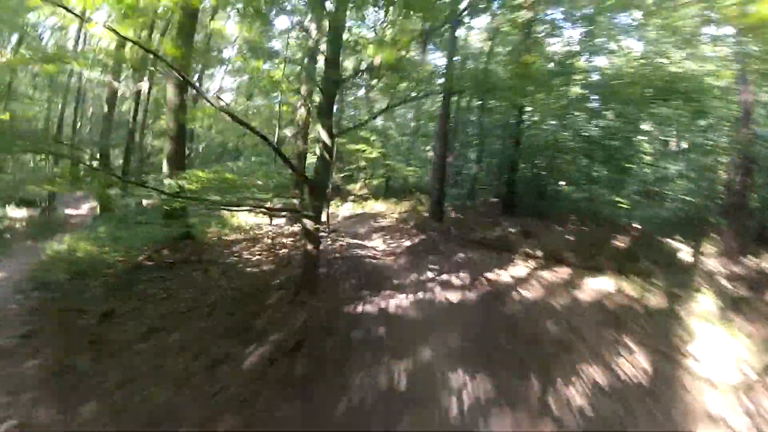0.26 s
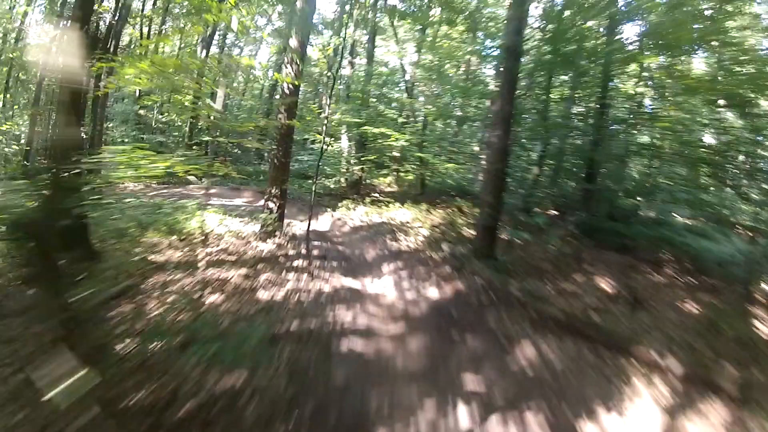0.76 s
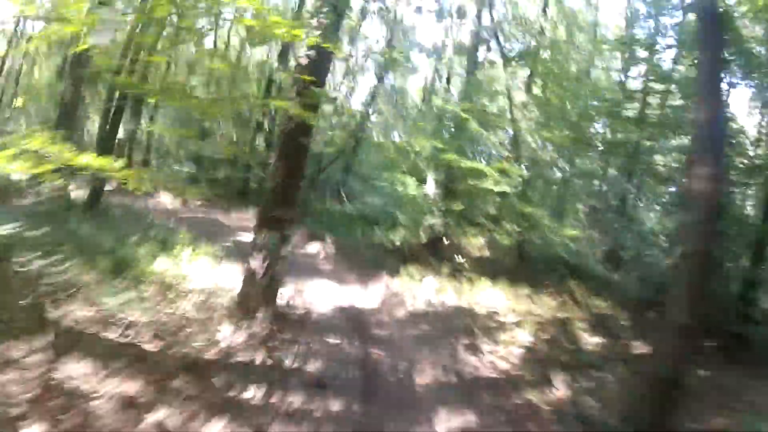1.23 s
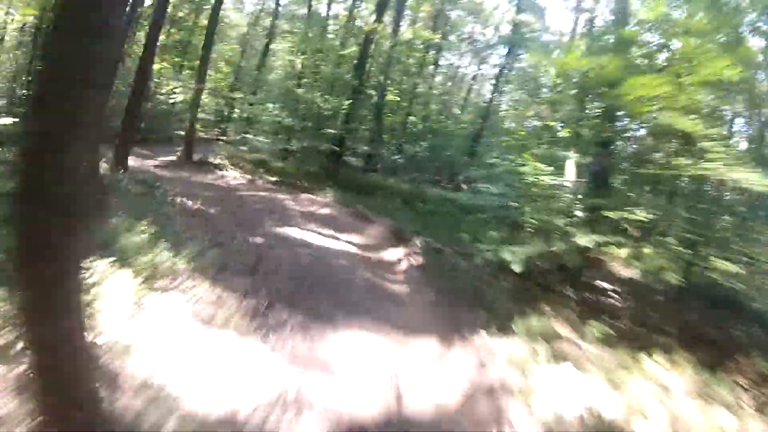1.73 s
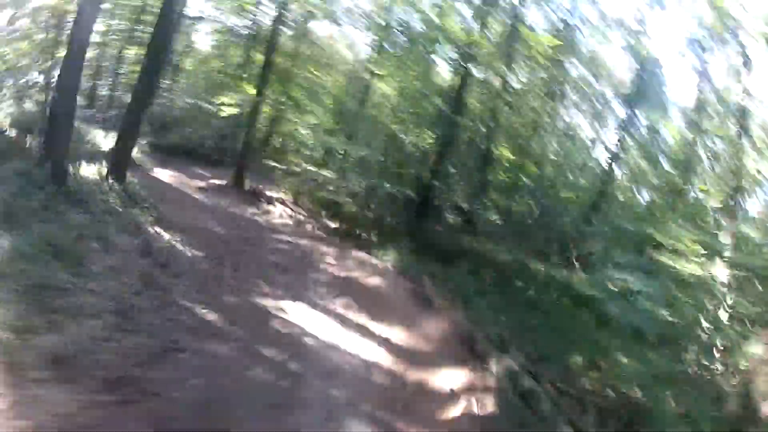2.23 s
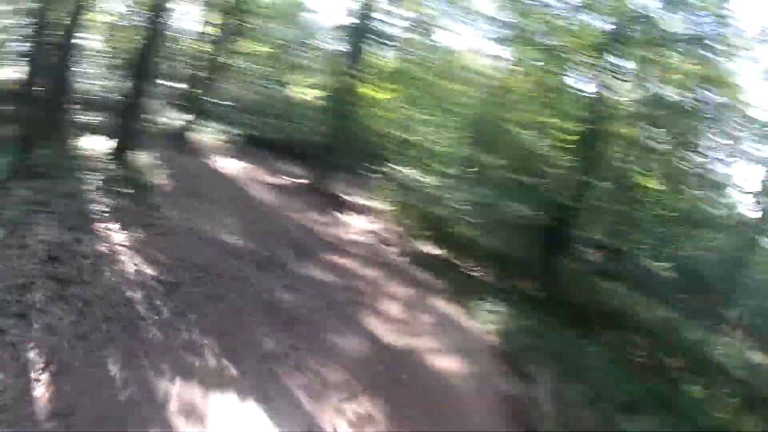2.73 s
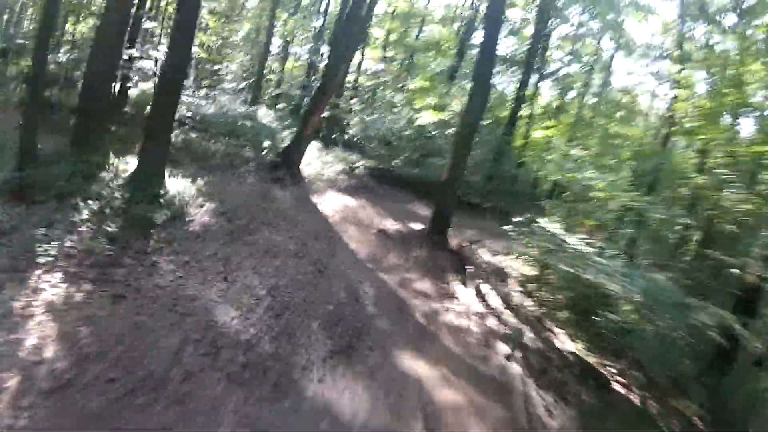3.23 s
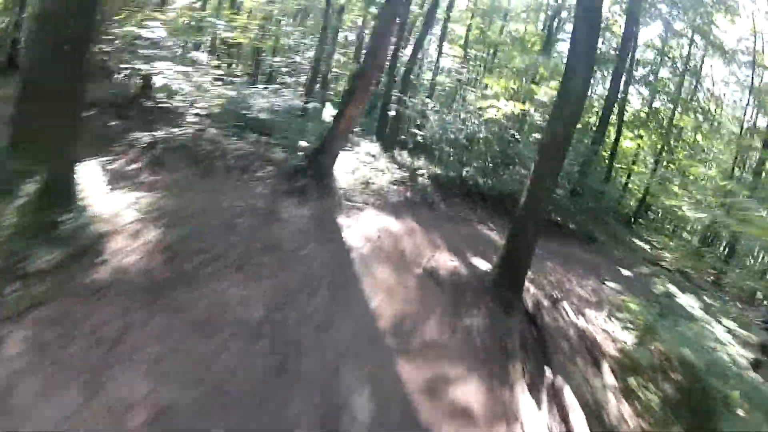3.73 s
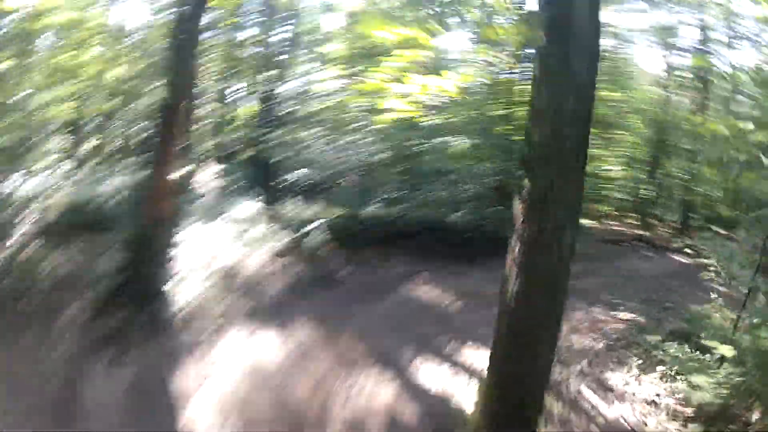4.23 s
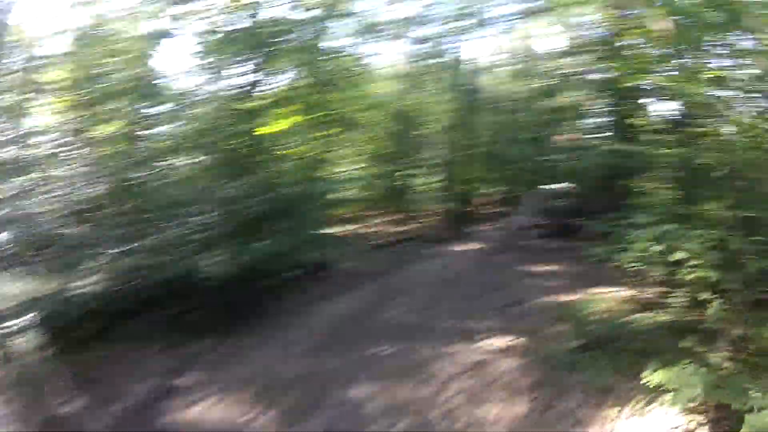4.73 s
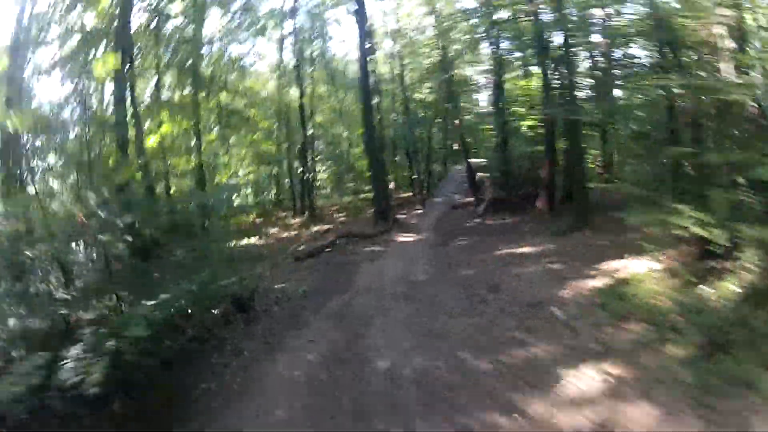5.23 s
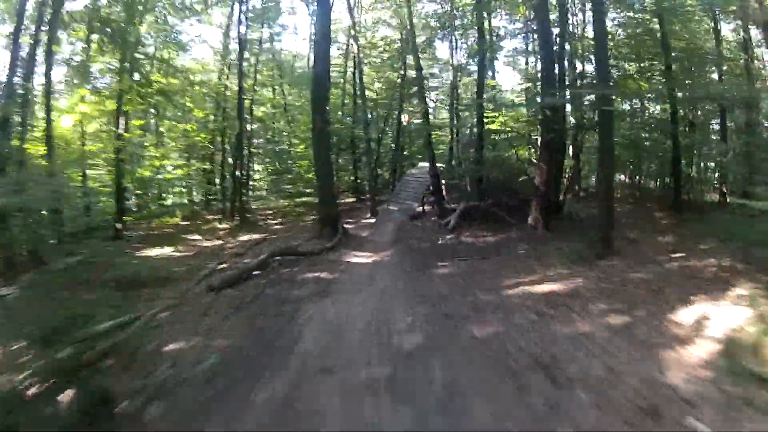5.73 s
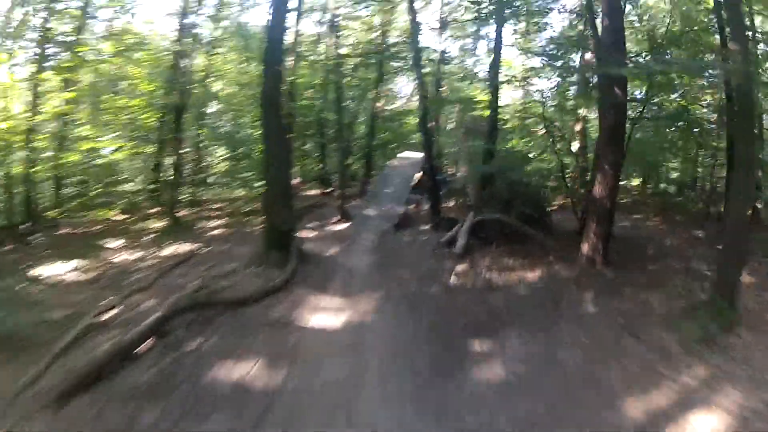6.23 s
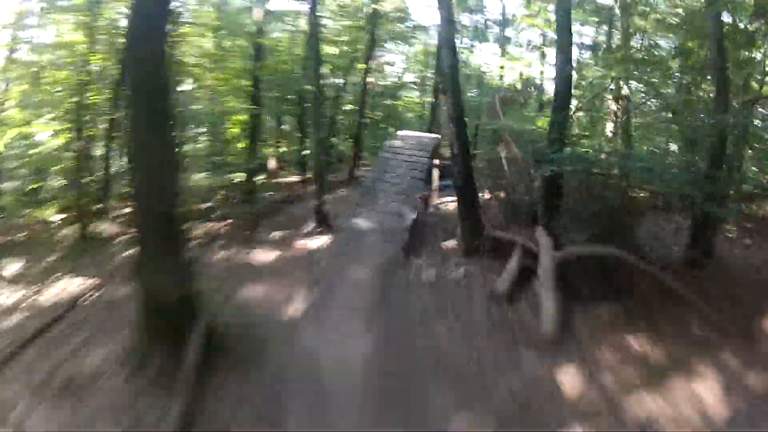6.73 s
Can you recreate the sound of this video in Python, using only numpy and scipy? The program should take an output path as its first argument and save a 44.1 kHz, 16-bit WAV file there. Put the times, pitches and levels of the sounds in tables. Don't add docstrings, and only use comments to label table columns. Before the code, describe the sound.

A small sealed camera on a bicycle hears everything close, boxy and gritty, with constant hiss and a coarse metallic edge to the treble. From 0 to 1.2 s wind and tyre roar run fairly steadily over a low rumble, with small grit ticks. At 1.3 s a loud hard clack lands with deep booming jolts; rattles and knocks crowd up to a heavy boom at 1.5 s, then thin out. Around 2.2 s a part chatters briefly, then another bright clack and boom hit at 2.3 s, a shorter, duller one at 2.7 s, and thudding jolts at 2.8 to 3 s. From 3.1 to 4.6 s it is much quieter: soft hiss, faint soil scuffs, light ticks. At 4.73 s a twig snaps on the shell with a low thump; a softer boom follows at 5.07 s. From 5.5 s wind and tyre noise grow, with a gritty scuff and rattle at 6.4 s, ending in the strongest rush.

```python
import sys
import numpy as np
from scipy import signal
from scipy.io import wavfile
from scipy.ndimage import uniform_filter1d

SR = 44100
rng = np.random.default_rng(int(sys.argv[2]) if len(sys.argv) > 2 else 0)


def persist_wave(psi):
    counts = np.round(np.clip(psi, -1, 1) * 32767).astype(np.int16)
    wavfile.write(sys.argv[1], SR, np.atleast_2d(counts).T)


def amplitude_ratio(level_db):
    exponent = np.asarray(level_db, float) / 20
    return 10 ** exponent


N = 307377


def unit(x):
    return x / np.sqrt(np.mean(x ** 2))


def band(x, hz, width_hz):
    return signal.lfilter(*signal.iirpeak(hz, hz / width_hz, fs=SR), x)


def between(x, lo_hz, hi_hz):
    return signal.sosfilt(signal.butter(2, [lo_hz, hi_hz], "bandpass", fs=SR, output="sos"), x)


def duller(x, hz):
    return signal.sosfilt(signal.butter(4, hz, fs=SR, output="sos"), x)


def colour(table, hz):
    table_hz, table_db = np.transpose(table)
    return np.interp(np.log(hz), np.log(table_hz), table_db)


def walk(rate_hz):
    hold = int(SR / rate_hz)
    steps = np.repeat(rng.standard_normal(N // hold + 1), hold)
    slewed = uniform_filter1d(uniform_filter1d(steps, hold), hold)
    return unit(slewed[:N])


def uneven_noise(n, spread_db):
    return rng.standard_normal(n) * amplitude_ratio(spread_db * rng.exponential(size=n))


def fade(t, t60_s):
    return np.exp(-np.log(1000) * t / t60_s)


def burst(t60_s, rise_s, spread_db):
    t = np.arange(SR // 10) / SR
    grains = uneven_noise(len(t), spread_db)
    return grains * (1 - np.exp(-t / rise_s)) * fade(t, t60_s)


def add(out, s, sound, peak_db):
    i = int(s * SR)
    scaled = amplitude_ratio(peak_db) * sound / np.abs(sound).max()
    out[i:i + len(sound)] += scaled[:N - i]


# frequency in Hz, level in dB per Hz.
WIND_COLOUR = [(65, -31), (110, -14), (161, -3.5), (347, -7), (545, -11.5), (898, -10.5), (1040, -26),
               (1150, -10.5), (2560, -14), (3190, -33.5), (3890, -21), (4160, -39), (5160, -41),
               (5900, -16.5), (7670, -70), (13000, -120)]
# frequency in Hz, level in dB per Hz.
TYRE_COLOUR = [(110, -7), (250, -3), (500, -12.5), (1000, -9.5), (1500, -5.5), (2200, -3), (2600, -5),
               (3100, -12.5), (4000, -30.5), (5900, -32)]
# frequency in Hz, width in Hz, level in dB (not used).
SHELL_MODES = [(898, 50, 0), (2573, 190, 0), (3570, 370, -7), (3700, 170, -9), (4980, 28, -21)]


def roar(wind_db, tyre_db):
    wind_db = -55.5 + 1.13 * (wind_db + 54.5)
    wind_power = amplitude_ratio(wind_db - 19 + 0.7 * walk(14)) ** 2
    tyre_power = amplitude_ratio(tyre_db - 33 + 1.8 * walk(22)) ** 2
    noises = [rng.standard_normal(N) for _ in range(3)]
    grit = amplitude_ratio(2.0 * rng.exponential(size=N))
    out = 0
    for k, hz in enumerate(110 * 2 ** (np.arange(18) / 3)):
        wind_part = wind_power * amplitude_ratio(colour(WIND_COLOUR, hz)) ** 2
        tyre_part = tyre_power * amplitude_ratio(colour(TYRE_COLOUR, hz)) ** 2
        noise = unit(between(noises[k % 3] * grit, hz / 1.15, hz * 1.138))
        out = out + np.sqrt((wind_part + tyre_part) * hz / 4) * noise
    return out + 0.92 * sum(band(out, hz, width_hz) for hz, width_hz, _ in SHELL_MODES)


# start in seconds, swing in dB, sway in Hz, 60 dB decay in seconds.
JOLTS_OF_MOUNT = [(1.262, -22, 33, 0.19), (2.84, -20, 33, 0.17), (4.722, -23, 58, 0.06),
                  (1.288, -9.5, 46, 0.11), (1.312, -6, 89, 0.044), (1.393, -17, 90.5, 0.18),
                  (1.435, -15.5, 49.8, 0.21), (1.453, -22, 95.5, 0.18), (1.495, -2, 88, 0.12),
                  (1.545, -21, 79, 0.15), (1.622, -27, 79.7, 0.23), (1.735, -18, 77, 0.096),
                  (2.025, -27.5, 82, 0.15), (2.287, -2, 77.7, 0.11), (2.429, -24, 73, 0.11),
                  (2.631, -25, 45.4, 0.14), (2.660, -22, 54, 0.17), (2.693, -4, 86.5, 0.12),
                  (2.813, -20.5, 44.8, .2), (2.828, -11, 79, 0.061), (2.857, -11.5, 94, 0.076),
                  (2.914, -2, 79, 0.087), (2.975, -15.5, 80, 0.11), (3.203, -31, 73.5, 0.19),
                  (3.628, -29, 74, 0.18), (4.7378, -13.5, 76.7, 0.13), (5.066, -14.5, 84, 0.056),
                  (5.490, -30, 79.4, 0.15), (5.790, -31, 72, 0.21), (5.908, -28, 67.4, 0.16)]


def jolts():
    out, t = np.zeros(N), np.arange(SR // 3) / SR
    for s, db, hz, t60_s in JOLTS_OF_MOUNT:
        swing = (1 - np.exp(-t / 0.0063)) * fade(t, t60_s) * np.sin(2 * np.pi * hz * t)
        add(out, s, swing, db + 20 * np.log10(np.abs(swing).max()))
    return out


def strike(events, body, bounce_share, push_share):
    favoured_hz, push_hz, blow_at = 2350, 1185, 8
    out = np.zeros(N)
    for s, db, tilt_db, lift_db, t60_s in events:
        blow = burst(t60_s, 0.00021, 2.62)
        blow = bounce_share * blow / np.abs(blow).max()
        blow[blow_at] = 1
        modes = 0
        for k, (hz, width_hz, mode_db) in enumerate(body):
            favour = np.exp(-(np.log2(hz / favoured_hz) / 0.42) ** 2)
            gain_db = mode_db + tilt_db * np.log2(hz / 1500) + lift_db * favour
            ring = band(band(blow, hz, width_hz), hz, 3.54 * width_hz)
            sign = (-1) ** k
            modes = modes + sign * amplitude_ratio(gain_db) * np.sqrt(width_hz) * unit(ring)
        push = duller(np.arange(len(blow)) == blow_at, push_hz)
        add(out, s, modes / np.abs(modes).max() + push_share * push / push.max(), db)
    return out


# frequency in Hz, width in Hz, level in dB.
HOUSING_MODES = [(170, 101, -1.5), (305, 260, 1.5), (476, 163, -1), (692, 263, -3.5), (1220, 145, -0.5),
                 (1480, 107, -19.5), (1820, 230, -1.5), (2350, 150, 0.5), (2970, 160, -11),
                 (3307, 180, -12.5), (3630, 166, -20.5), (3930, 920, -31.5), (5000, 150, -39.5)]
# start in seconds, peak in dB, tilt in dB per octave, lift of the favoured ring in dB,
# 60 dB decay in seconds.
HARD_CLACKS = [
    (1.2995, -2, 0.5, 10, 0.012),
    (2.2832, -4.5, 1, -3.5, 0.018),
    (2.6943, -3, -1.5, 0.5, 0.011),
]


def clacks():
    return strike(HARD_CLACKS, HOUSING_MODES, bounce_share=0.35, push_share=0.54)


# frequency in Hz, width in Hz, level in dB.
TWIG_MODES = [(180, 64, 1.5), (433, 130, -16.5), (793, 100, 1.5), (1500, 120, -9.5), (1900, 390, -2),
              (2400, 160, 0), (3180, 730, -4.5), (4120, 850, -13.5), (4760, 880, -13.5)]
# start in seconds, peak in dB, tilt in dB per octave, lift of the favoured ring in dB,
# 60 dB decay in seconds.
TWIG_SNAPS = [
    (4.7302, -12, 0, 0, 0.013),
]


def snaps():
    return strike(TWIG_SNAPS, TWIG_MODES, bounce_share=0.51, push_share=0)


# start in seconds, peak in dB, ring in Hz, hardness as edge in Hz,
# 60 dB decay in seconds.
FRAME_KNOCKS = [
    (1.486, -14, 197, 950, 0.025),
    (1.718, -24.5, 141, 550, 0.032),
    (2.027, -43, 170, 350, .013),
    (2.419, -38, 160, 300, 0.025),
    (2.836, -30, 197, 800, 0.064),
    (2.849, -22, 219, 870, 0.031),
    (2.906, -20.5, 290, 860, 0.02),
    (2.969, -26, 180, 790, 0.023),
    (3.629, -36.5, 143, 283, .021),
    (5.057, -35, 161, 278, 0.069),
]
# start in seconds, peak in dB, 60 dB decay in seconds.
HOLLOW_TAPS = [
    (1.452, -32, .079),
    (1.640, -46, .034),
    (2.615, -36.5, 0.038),
    (3.215, -55.5, .03),
    (3.386, -52, .026),
]


def thuds():
    out = np.zeros(N)
    contacts = [(s, db, 895, 1020, t60_s, -12) for s, db, t60_s in HOLLOW_TAPS]
    for s, db, hz, edge_hz, t60_s in FRAME_KNOCKS:
        edge_db = -1.5 + 12.5 * np.log2(edge_hz / 895)
        contacts.append((s, db, hz, edge_hz, t60_s, edge_db))
    for s, db, hz, edge_hz, t60_s, edge_db in contacts:
        push = duller(burst(t60_s, 0.00045, 2.0), edge_hz)
        low = band(band(push, hz, 0.37 * hz), hz, 1.5 * hz)
        edge = band(push, 0.32 * edge_hz, 0.78 * edge_hz)
        add(out, s, unit(low) + amplitude_ratio(edge_db) * unit(edge), db)
    return out


def crunch(out, s, peak_db, hz, t60_s, edge_db, rise_s):
    grains = burst(t60_s, rise_s, 1.6)
    add(out, s, band(grains, hz, 300) + 0.55 * between(grains, 1350, 2800), peak_db)
    edge = between(grains, 2100, 8300) + band(grains, 3660, 250) + 0.65 * band(grains, 5040, 264)
    add(out, s, edge, peak_db + edge_db)


# start in seconds, peak in dB, ring in Hz.
GRIT_HITS = [(0.1422, -38, 2420), (0.697, -41, 1750), (0.846, -41.5, 2500), (0.9881, -38, 1940),
             (1.043, -40.5, 2550), (1.2647, -35, 1820), (1.331, -36, 1310), (1.5586, -35.5, 2410),
             (1.6632, -40, 2460), (1.763, -37.5, 2800), (1.917, -42.5, 2400), (2.173, -38, 1480),
             (2.226, -34, 2120), (2.4217, -40, 2520), (2.453, -42.5, 2500), (2.5524, -40, 2310),
             (2.5765, -45, 2430), (2.6289, -34.5, 2530), (2.8317, -39, 1660), (3.3072, -49.5, 2380),
             (3.4022, -45.5, 1970), (3.491, -44.5, 2100), (3.791, -43.5, 2350), (3.9437, -41, 2400),
             (4.3944, -48, 2350), (4.4618, -41.5, 2400), (4.587, -42.5, 2350), (4.878, -48, 2300),
             (5.056, -46.5, 2260), (5.5608, -49, 2370)]


def grit_ticks():
    out = np.zeros(N)
    for s, db, hz in GRIT_HITS:
        crunch(out, s, db, hz, t60_s=0.064, edge_db=-2.5, rise_s=0.0008)
    return out


# start in seconds, peak in dB, ring in Hz, 60 dB decay in seconds.
LOOSE_RATTLES = [(0.601, -44.5, 1980, 0.03), (1.2435, -38.5, 1830, .088), (1.3483, -31, 1880, .068),
                 (1.3628, -36, 1810, .039), (1.4064, -29.5, 1940, 0.054), (1.431, -39, 2400, .064),
                 (1.442, -29, 2580, 0.25), (1.457, -27, 2400, .055), (2.2813, -17, 2400, .02),
                 (1.496, -23, 1810, .05), (1.631, -31, 2370, .06), (1.705, -44.5, 1970, .046),
                 (1.8768, -37, 2250, 0.074), (1.9604, -43, 1820, 0.042), (2.0883, -41.5, 1550, 0.047),
                 (2.3919, -39, 1820, 0.38), (2.4918, -37, 2400, .082), (2.6139, -34, 1820, 0.1),
                 (2.6465, -35.5, 2250, .026), (2.7636, -34.5, 1760, 0.14), (2.8509, -33, 2300, 0.031),
                 (2.9687, -37, 1920, 0.05), (3.7368, -33.5, 1820, 0.035), (4.0453, -47.5, 2170, 0.041),
                 (4.2527, -51, 2020, .061), (4.3161, -48.5, 2160, .15), (4.563, -47.5, 2270, .068),
                 (4.6074, -42, 2170, 0.075), (6.4213, -33, 2100, .032), (6.687, -52, 2640, 0.026)]


def rattles():
    out = np.zeros(N)
    for s, db, hz, t60_s in LOOSE_RATTLES:
        crunch(out, s, db, hz, t60_s, edge_db=-22, rise_s=0.0014)
    return out


# start in seconds, peak in dB, ring in Hz, slips, seconds between slips.
SLIPS = [
    (2.2012, -22.5, 1500, 3, .0066),
]


def chatter():
    out = np.zeros(N)
    for s, db, hz, count, gap_s in SLIPS:
        for k in range(int(count)):
            slip = between(burst(0.018, 0.0014, 1.8), 1170, 2530)
            add(out, s + k * gap_s, band(slip, hz, 260), db)
    return out


# start in seconds, length in seconds, level in dB, ring in Hz.
SOIL_SCUFFS = [(3.217, .06, -63, 1900), (3.303, .06, -67, 2130), (3.413, 0.19, -62, 2030),
               (3.802, 0.11, -57.5, 2230), (4.017, 0.046, -69, 2100), (4.235, 0.054, -64, 2100),
               (4.305, 0.13, -63, 2230), (4.544, 0.087, -63, 2180), (2.232, 0.043, -62, 2200),
               (6.023, 0.21, -75.5, 2600), (6.409, 0.046, -46.5, 1580)]


def scuffs():
    t, out = np.arange(N) / SR, 0
    grit = uneven_noise(N, 3.9)
    for s, length_s, db, hz in SOIL_SCUFFS:
        swell = np.sin(np.pi * np.clip((t - s) / length_s, 0, 1)) ** 0.5
        out = out + amplitude_ratio(db) * swell * unit(between(grit, hz / 1.18, hz * 1.09))
    return out


def rumble(rough_db):
    sway = band(band(rng.standard_normal(N) * amplitude_ratio(4.0 * walk(5.1)), 78.6, 18), 73, 37)
    buffet = between(rng.standard_normal(N) * amplitude_ratio(3.4 * walk(6)), 9.5, 46)
    buffet_db = -49.5 + (rough_db + 51)
    drone = amplitude_ratio(-66 + 2.0 * walk(9)) * unit(between(rng.standard_normal(N), 150, 480))
    return drone + amplitude_ratio(rough_db) * unit(sway) + amplitude_ratio(buffet_db) * unit(buffet)


# time in seconds, wind in dB, tyre load in dB, roughness of the track in dB.
RIDE_COURSE = [(0.0, -55.5, -47.5, -46), (1.15, -55.5, -53.5, -47.5), (1.33, -53.5, -46, -44),
               (1.44, -53.5, -38, -47), (1.6, -59.5, -52, -51.5), (2.08, -59, -59, -50.5),
               (2.23, -68, -45.5, -42.5), (2.41, -61.5, -55, -41.5), (2.9, -60, -54, -47.5),
               (3.1, -66, -61.5, -51.5), (3.4, -69.5, -65, -57.5), (4.25, -64.5, -64.5, -51.5),
               (5.2, -66.5, -61, -56), (5.5, -63, -56, -47), (5.85, -59, -48.5, -53),
               (6.12, -58.5, -55.5, -48), (6.33, -56.5, -47, -46.5), (6.97, -52.5, -46, -43)]


def scene():
    s, *columns = np.transpose(RIDE_COURSE)
    wind_db, tyre_db, rough_db = (np.interp(np.arange(N) / SR, s, c) for c in columns)
    mono = roar(wind_db, tyre_db) + jolts() + clacks() + snaps() + thuds()
    mono = mono + grit_ticks() + rattles() + chatter() + scuffs() + rumble(rough_db)
    return np.array([mono, mono])


def amplifier_noise():
    shared_db, own_db, flicker_db = -68.5, -72, -78.5
    flat, low = rng.standard_normal((2, 2, N))
    hiss = amplitude_ratio(shared_db) * rng.standard_normal(N) + amplitude_ratio(own_db) * flat
    return hiss + amplitude_ratio(flicker_db) * unit(signal.lfilter([1], [1, -0.992], low))


def sample_and_hold(x):
    hold_hz, clock_hz = 12000, 48000
    x = signal.sosfilt(signal.butter(10, 5550, fs=SR, output="sos"), x)
    slow = signal.resample_poly(x, hold_hz // 300, SR // 300, axis=1)
    held = np.repeat(slow, clock_hz // hold_hz, axis=1)
    x = signal.resample_poly(held, SR // 300, clock_hz // 300, axis=1)
    x = np.roll(np.pad(x, ((0, 0), (0, 8)))[:, :N], -8, axis=1)
    return signal.sosfilt(signal.ellip(6, 0.2, 34, 15100, fs=SR, output="sos"), x)


def roll_off(x):
    return signal.sosfilt(signal.butter(12, 16530, fs=SR, output="sos"), x)


def record(dry):
    mix = sample_and_hold(dry + amplifier_noise())
    return roll_off(mix)


dry = scene()
out = record(dry)
persist_wave(out)
```